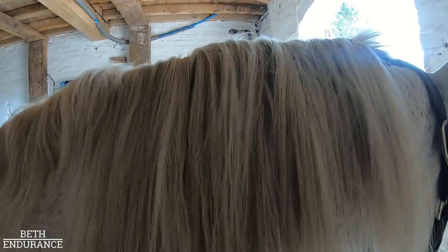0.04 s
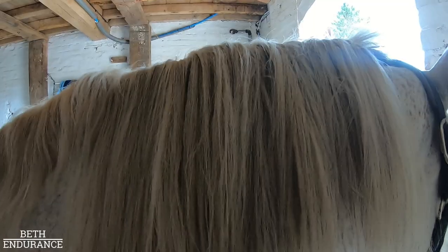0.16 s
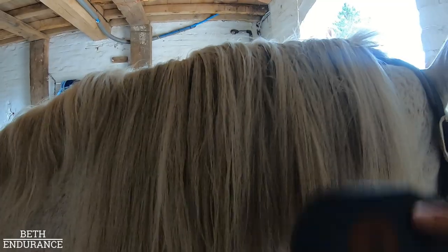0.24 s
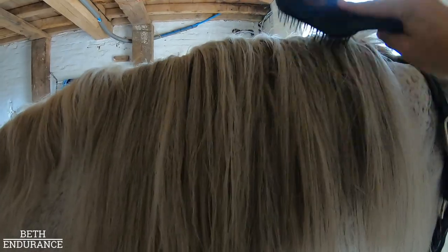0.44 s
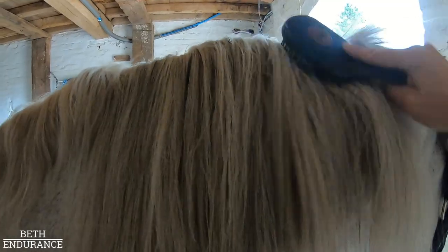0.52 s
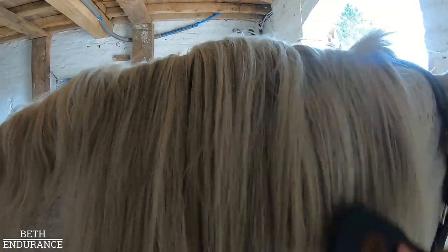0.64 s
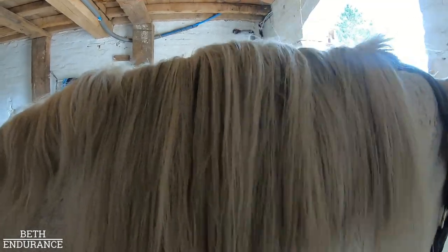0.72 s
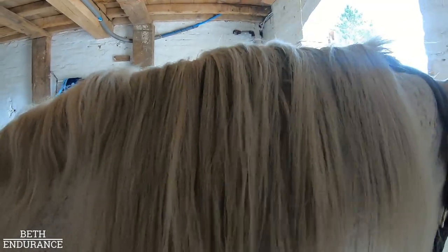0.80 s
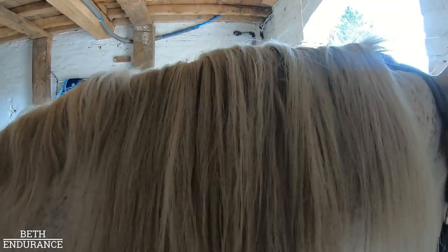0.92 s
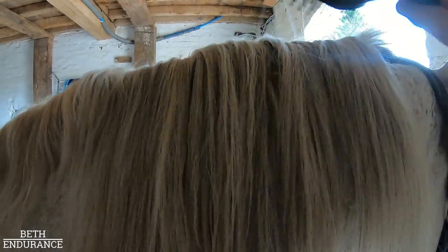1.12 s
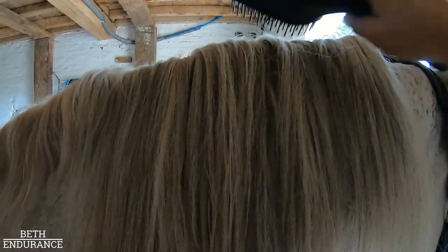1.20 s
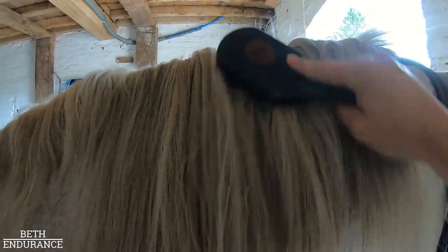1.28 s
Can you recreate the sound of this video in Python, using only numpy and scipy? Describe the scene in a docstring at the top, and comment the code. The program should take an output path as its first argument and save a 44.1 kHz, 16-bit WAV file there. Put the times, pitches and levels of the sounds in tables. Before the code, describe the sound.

Brushing a horse's coarse mane: dry raspy strokes with tiny snaps, and one low microphone knock

```python
"""A brush hisses and snaps through a horse's mane in a quiet stable: three strokes, the last cut short.
Noise and dense ringing slips make the strokes; short pitched bursts make the bristle snaps.
Between the first two, something knocks the microphone's mount: a touch, then a thump of a sagging sine
and ringing modes, with rattle and tail of noise. Soft low bumps follow. Steady room noise and
slow rumbling air lie beneath; a faint noise-tail reverb surrounds the brush."""
import sys
import numpy as np
from scipy import signal
from scipy.fft import rfft, irfft
from scipy.io import wavfile
from scipy.ndimage import uniform_filter1d

SR = 44100
rng = np.random.default_rng(int(sys.argv[2]) if len(sys.argv) > 2 else 0)


def to_wav(s):
    """Save 16-bit WAV."""
    ch = np.atleast_2d(s).T  # columns
    pcm = np.round(np.clip(ch, -1, 1) * 32767)  # PCM
    wavfile.write(sys.argv[1], SR, pcm.astype(np.int16))


N = 59535  # samples: 1.35 s

# Brush pressure, one list per stroke: time_s, low_rub_db, scrape_db, bristle_ring_db, treble_db
STROKES = [
    [(0, -47, -45.5, -64, -48.5), (.015, -54, -54, -55.5, -54.5), (.032, -63.5, -49.5, -53.5, -51),
     (.056, -49.5, -57, -56.5, -55.5), (.075, -79, -63, -65, -63.5), (.12, -69, -82, -78, -77),
     (.2, -93, -82, -91.5, -97)],
    [(.5, -100, -99, -104, -96), (.55, -88, -78, -73, -75), (.575, -80, -78, -73, -74),
     (.59, -80, -61.5, -62, -64), (.62, -67.5, -57, -61.5, -53), (.65, -63, -50, -53, -54),
     (.684, -55.5, -45.5, -52.5, -50.5), (.72, -53, -52, -49, -51.5), (.745, -54, -49.5, -54, -53.5),
     (.788, -54.5, -51, -52, -49), (.818, -77, -62.5, -66, -65), (.85, -63.5, -74, -75, -74),
     (.92, -95, -92, -96, -100)],
    [(1.26, -96, -99, -94, -90), (1.29, -89, -82, -82, -80), (1.308, -89, -70.5, -73.5, -73),
     (1.322, -94, -71, -76, -74.5), (1.35, -73, -65.5, -62, -67)],
]
# Frequencies that part those four bands: split_hz
BAND_SPLITS = [900, 3200, 5500]
# Colour of the brushed hair: frequency_hz, level_db (per Hz, relative)
HAIR_COLOUR = [(30, -38), (60, 6), (120, -2), (240, 7), (870, -1), (1050, -2), (2000, -5.5), (4150, -5.5),
               (5590, -8), (9690, -7.5), (15800, -15)]
# What the bristles ring with at each slip: pitch_hz, width_hz, level_db (relative)
BRISTLE_RINGS = [(244, 134, -3.5), (655, 230, 2), (2000, 560, 6), (2710, 520, 1.5), (4270, 1250, 3.5),
                 (7000, 1300, 1.5), (9500, 2100, 3.5)]
# Bristles that catch and snap free: start_s, peak_db, pitch_hz
SNAPS = [(.003, -35, 2500), (0.013, -34.5, 9400), (.036, -34, 9500), (.045, -33.5, 8600),
         (0.051, -31.5, 7800), (.589, -41, 8000), (.655, -33.5, 9500), (0.696, -42, 5500),
         (.703, -40, 8200), (.715, -29, 9200), (.718, -34, 7000), (0.723, -42.5, 4600),
         (0.7266, -30.5, 7460), (0.756, -32, 6550), (0.785, -29, 8400)]
# Modes of the knocked mount: pitch_hz, level_db (before rise and decay), rise_s, t60_s
MOUNT_MODES = [(111.5, -15, 0.0033, 0.15), (166.4, 12, 0.023, 0.051), (210, -20, 0.006, 0.09),
               (263, -34, 0.006, 0.11), (457, -34.5, 0.0022, 0.049), (770, -48.5, 0.0036, 0.074),
               (1355, -52, 0.0025, 0.045), (1830, -63, .001, 0.12), (13500, -45, .0003, .012),
               (13300, -61, .001, .1)]
# Colour of the short rattle: frequency_hz, level_db (relative)
RATTLE_COLOUR = [(300, 15), (1000, 4), (2500, 0), (3700, 0.5), (6500, -3), (10000, -8), (13500, -5),
                 (16000, -18)]
# Colour of the knock's noisy tail: frequency_hz, level_db (relative)
TAIL_COLOUR = [(200, -20), (400, 4.5), (1500, -4), (2300, -15), (4000, -16), (16000, -33)]
# Low bumps, the mount swinging back, then the brush landing on the neck: start_s, peak_db, length_s
BUMPS = [(0.309, -17, 0.048), (0.544, -47, 0.016), (1.304, -48, 0.011)]
# Reverb of the stable: frequency_hz, t60_s
STABLE_DECAY = [(200, 0.67), (2000, .3), (6000, 0.36), (14000, 0.056)]
# Colour of the room noise: frequency_hz, level_db (per Hz, relative)
AIR_COLOUR = [(26, -43), (45, 10), (63, -12), (129, -1.5), (157, -16), (244, -11.5), (297, -19),
              (371, -15.5), (462, -14.5), (549, -22), (1330, -25), (2160, -28), (15800, -36.5)]
# Colour of the slow rumble: frequency_hz, level_db (per Hz, relative)
RUMBLE_COLOUR = [(2, -8), (5, 3.5), (10, -5), (17, -21), (28, -23), (45, -45), (100, -100)]
# Sway of the slow rumble: time_s, level_db
RUMBLE_SWAY = [(0, -40), (.2, -30), (.45, -29), (.6, -37), (.78, -40), (.88, -30), (1.03, -26), (1.15, -36),
               (1.35, -36)]

SLIPS_PER_S, SLIP_SPREAD_DB = 6000, 2.5
HISS_SHARE, PATCHY_DB = 0.47, 1.5
SNAP_DECAY_S, SNAP_WIDTH = 0.00047, 0.52  # width as a share of the pitch
TOUCH_S, TOUCH_DB, TOUCH_HZ, TOUCH_T60_S = 0.2438, -39, 1600, 0.0057
KNOCK_S = 0.2478
PUSH_DB, PUSH_RISE_S, PUSH_T60_S = -4.5, 0.0018, 0.18  # level before rise and decay
PUSH_START_HZ, PUSH_END_HZ, PUSH_SAG_S = 72.3, 17.3, 0.011
RATTLE_DB, RATTLE_T60_S, RATTLE_LEAD_S = -51, 0.053, 0.0017
TAIL_DB, TAIL_T60_S = -59.5, 0.38
STABLE_DB, AIR_DB = -18, -64
EDGE_HZ = 15850


def brush():
    """Dense slips ring the bristles over a patchy hiss, in four bands that follow each stroke."""
    t = np.arange(N) / SR
    slip_db = SLIP_SPREAD_DB * np.minimum(rng.exponential(1, N), 5)
    slip_size = gain_of(slip_db) * (rng.random(N) < SLIPS_PER_S / SR)
    which_ring = rng.integers(0, len(BRISTLE_RINGS), N)
    slips = np.zeros(N)
    ring_t = t[:1500]
    for k, (pitch_hz, width_hz, db) in enumerate(BRISTLE_RINGS):
        ring = np.exp(-np.pi * width_hz * ring_t) * np.sin(2 * np.pi * pitch_hz * ring_t)
        ringing = signal.oaconvolve(slip_size * (which_ring == k), ring)[:N]
        slips += gain_of(db) * evened(ringing)
    source = HISS_SHARE * rng.standard_normal(N) + (1 - HISS_SHARE) * evened(slips)

    # random patches of level, smoothed over time and then pitch
    spectrum = signal.stft(source, nperseg=256)[2]
    patches = uniform_filter1d(rng.standard_normal(spectrum.T.shape), size=8, axis=0)
    patches = evened(uniform_filter1d(patches, size=4, axis=1))
    patchy = signal.istft(spectrum * gain_of(PATCHY_DB * patches.T), nperseg=256)[1][:N]
    rub = coloured(patchy, HAIR_COLOUR)

    # neighbouring low-pass curves subtract to give the bands
    hz = np.fft.rfftfreq(N, 1 / SR)
    below = [0] + [1 / (1 + (hz / split) ** 6) for split in BAND_SPLITS] + [1]
    rub_spectrum = rfft(rub)
    bands = [evened(irfft(rub_spectrum * (upper - lower), N)) for lower, upper in zip(below, below[1:])]
    out = np.zeros(N)
    for stroke in STROKES:
        times, *levels = np.transpose(stroke)
        during = (t >= times[0]) & (t <= times[-1])
        for band, db in zip(bands, levels):
            out += band * gain_of(np.interp(t, times, db)) * during
    return out


def snaps():
    """A bristle springing free is a very short noise burst, band-passed around its pitch."""
    out = np.zeros(N)
    t = np.arange(200) / SR
    for start_s, db, pitch_hz in SNAPS:
        burst = rng.standard_normal(len(t)) * np.exp(-t / SNAP_DECAY_S)
        edges = [pitch_hz / (1 + SNAP_WIDTH), min(pitch_hz * (1 + SNAP_WIDTH), SR * 0.45)]
        b, a = signal.butter(2, edges, "band", fs=SR)
        snap = signal.lfilter(b, a, burst)
        add(out, start_s, gain_of(db) * snap / abs(snap).max())
    return out


def stable(x):
    """Reverb from a noise tail in which each frequency dies at its own speed."""
    hz, t, spectrum = signal.stft(rng.standard_normal(SR // 2), SR, nperseg=256)
    decay = gain_of(-60 * t / read(STABLE_DECAY, hz)[:, None])
    tail = signal.istft(spectrum * decay, SR, nperseg=256)[1]
    return signal.fftconvolve(x, tail / np.linalg.norm(tail))[:N]


def knock():
    """A light touch, then a push whose pitch sags, the ringing mount, a short rattle and a noisy tail."""
    out = np.zeros(N)
    t = np.arange(SR // 2) / SR
    touch = gain_of(TOUCH_DB - 60 * t / TOUCH_T60_S) * np.sin(2 * np.pi * TOUCH_HZ * t)

    # the integral of the sagging pitch, in cycles
    sag = (PUSH_START_HZ - PUSH_END_HZ) * PUSH_SAG_S * (1 - np.exp(-t / PUSH_SAG_S))
    cycles = PUSH_END_HZ * t + sag
    push_level = gain_of(PUSH_DB - 60 * t / PUSH_T60_S) * (1 - np.exp(-t / PUSH_RISE_S))
    thump = push_level * np.sin(2 * np.pi * cycles)
    for pitch_hz, db, rise_s, t60_s in MOUNT_MODES:
        level = gain_of(db - 60 * t / t60_s) * (1 - np.exp(-t / rise_s)) ** 2
        thump += level * np.sin(2 * np.pi * pitch_hz * t)

    rattle = evened(coloured(rng.standard_normal(len(t)), RATTLE_COLOUR))
    rattle *= gain_of(RATTLE_DB - 60 * t / RATTLE_T60_S)
    rattle *= np.minimum(t / RATTLE_LEAD_S, 1)
    tail = evened(coloured(rng.standard_normal(len(t)), TAIL_COLOUR))
    tail *= gain_of(TAIL_DB - 60 * t / TAIL_T60_S)

    add(out, TOUCH_S, -touch)
    add(out, KNOCK_S - RATTLE_LEAD_S, rattle)
    add(out, KNOCK_S, tail - thump)
    return out


def bumps():
    """Each bump is one smooth dip of pressure."""
    out = np.zeros(N)
    for start_s, db, length_s in BUMPS:
        t = np.arange(0, length_s, 1 / SR)
        add(out, start_s, -gain_of(db) * np.sin(np.pi * t / length_s) ** 2)
    return out


def air():
    """Steady coloured room noise over a slow, swaying rumble mostly below hearing."""
    times, db = np.transpose(RUMBLE_SWAY)
    sway = gain_of(np.interp(np.arange(N) / SR, times, db))
    rumble = sway * evened(coloured(rng.standard_normal(N), RUMBLE_COLOUR))
    room_noise = gain_of(AIR_DB) * evened(coloured(rng.standard_normal(N), AIR_COLOUR))
    return room_noise + rumble


def gain_of(db):
    """Turns decibels into an amplitude factor."""
    return 10 ** (np.asarray(db) / 20)


def evened(x):
    """Scales a sound to an RMS of one."""
    return x / np.sqrt(np.mean(x ** 2) + 1e-20)


def read(points, hz):
    """Reads a table between its points, along a logarithmic frequency axis."""
    f, value = np.transpose(points)
    return np.interp(np.log(hz + 1), np.log(f + 1), value)


def coloured(x, points):
    """Filters a sound by a table of frequency and level."""
    hz = np.fft.rfftfreq(len(x), 1 / SR)
    return irfft(rfft(x) * gain_of(read(points, hz)), len(x))


def add(mix, start_s, sound):
    """Lays a sound into the mix, cut off at the mix's end."""
    part = mix[round(start_s * SR):][:len(sound)]
    part += sound[:len(part)]


def scene():
    """Only the brush and its snaps get reverb; knock, bumps and air stay dry."""
    grooming = brush() + snaps()
    reverb = gain_of(STABLE_DB) * stable(grooming)
    return (grooming + reverb + knock() + bumps() + air())[None]


def record(dry):
    """A steep low-pass closes off the extreme treble."""
    low_pass = signal.firwin(511, EDGE_HZ, window=("kaiser", 9), fs=SR)
    return signal.oaconvolve(dry, low_pass[None], "same")


dry = scene()
out = record(dry)
to_wav(out)
```